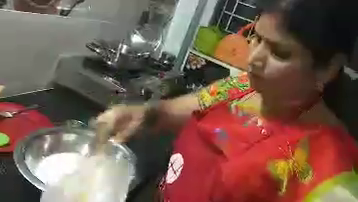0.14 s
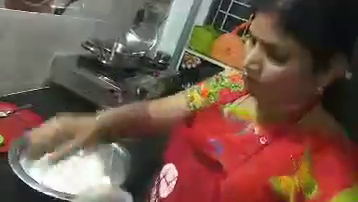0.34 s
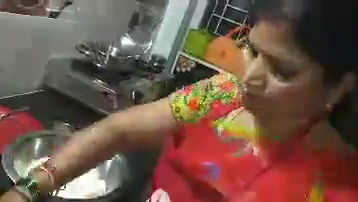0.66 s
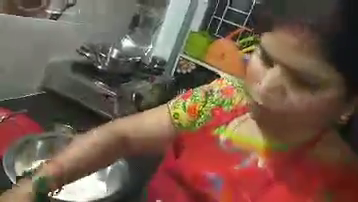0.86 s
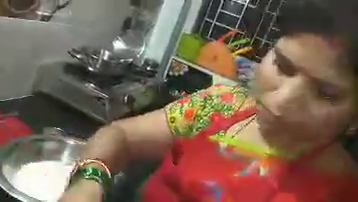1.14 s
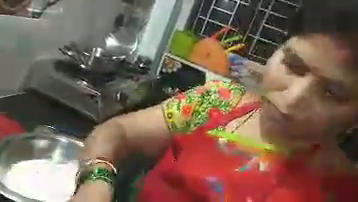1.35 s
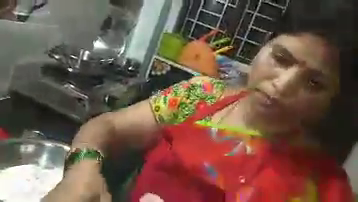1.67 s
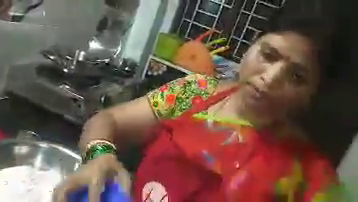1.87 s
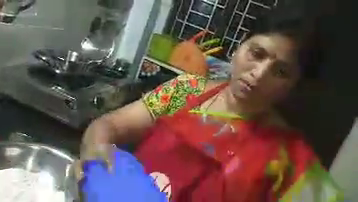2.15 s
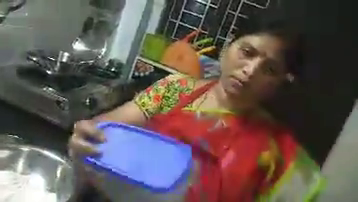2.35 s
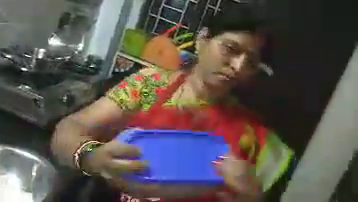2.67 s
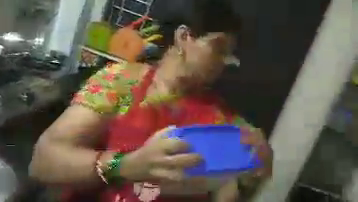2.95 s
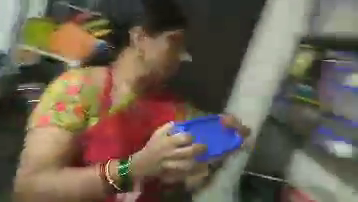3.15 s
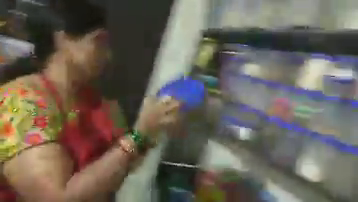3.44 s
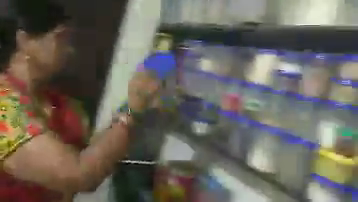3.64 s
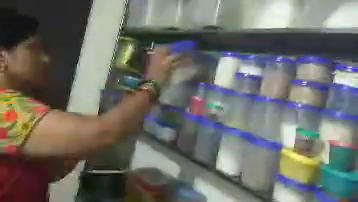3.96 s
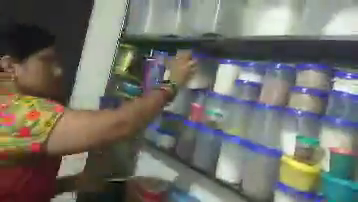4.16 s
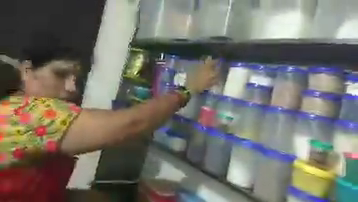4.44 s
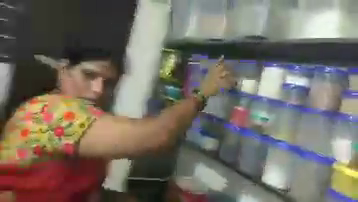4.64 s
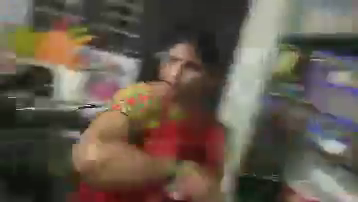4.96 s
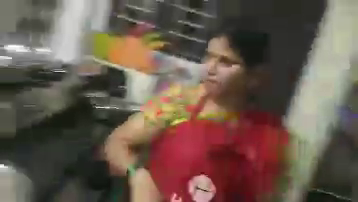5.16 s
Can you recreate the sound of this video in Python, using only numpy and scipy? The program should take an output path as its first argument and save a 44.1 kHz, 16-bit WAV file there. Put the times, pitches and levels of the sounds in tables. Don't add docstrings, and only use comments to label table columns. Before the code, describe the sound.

Light ticks, plastic taps and glassy bangle rattles open over soft room noise. After a quieter moment, a box lid snaps shut hard twice, by far the loudest sounds. Hands rub the plastic, bangles shake strongly, and the box bumps and slides among jars with dull hollow clatter. A few delicate clinks end it. Small reverberant kitchen, heard close by a small microphone with little deep bass.

```python
import sys
import numpy as np
from scipy import signal
from scipy.io import wavfile
from scipy.ndimage import uniform_filter1d

SR = 44100
rng = np.random.default_rng(int(sys.argv[2]) if len(sys.argv) > 2 else 0)


def convert_level_to_amplitude(level_db):
    exponent = np.asarray(level_db, float) / 20
    return 10 ** exponent


def master(y):
    cut = np.clip(np.atleast_2d(y).T, -1, 1)
    pcm = np.round(cut * 32767)
    wavfile.write(sys.argv[1], SR, pcm.astype(np.int16))


N = 234095

# frequency in Hz, level in dB per Hz.
AIR_COLOUR = [(15, -55), (25, -8.5), (195, -8.5), (256, -6.5), (384, -5), (560, -4.5), (659, -10),
              (1020, -8), (1700, -10), (3080, -10.5), (5570, -26), (7310, -21.5), (9070, -29.5),
              (14800, -39), (16000, -33)]
# time in seconds, level in dB.
AIR_LEVEL = [(0, -67), (.17, -65.5), (.21, -62), (1.5, -61), (2.999, -60), (4.6, -61.5), (5.31, -60.5)]
# frequency in Hz, width in Hz, level in dB.
HUM_LINES = [(207.1, 5.3, -71), (375.5, 22, -71), (458, 26.9, -82)]
# frequency in Hz, t60 in seconds.
KITCHEN_T60 = [(80, 0.35), (250, 0.34), (1000, 0.3), (3000, 0.35), (7000, 0.3), (12000, 0.2304),
               (16000, 0.15)]

# frequency in Hz, level in dB.
ARMFUL_MODES = [(4600, -20), (5790, -16), (6540, -11), (7750, -6), (8000, -1), (8400, -6), (8700, -5),
                (9100, -18), (9600, -17), (10270, -11), (10920, -4), (12600, -4), (12900, -9), (13320, 6),
                (13720, -7), (14200, -21), (14600, -11), (15000, -4.5), (15300, -1)]
# start in seconds, peak level in dB, time to swell in seconds,
# treble in dB per octave, grit in dB.
ARM_SHAKES = [(.184, -41, 0.0091, -14, -9), (.531, -33.5, 0.0076, -1, -2.5), (0.642, -25, 0.0095, 1, -0.5),
              (0.794, -42, 0.0067, 3.5, 3), (1.047, -42, 0.011, -3, 2.5), (1.943, -42, 0.0059, -3, -4.5),
              (2.104, -32.5, 0.015, -10, -5), (2.215, -49, 0.0445, 0.5, 6.5),
              (2.348, -48.5, 0.00634, 2.5, 5), (3.670, -18, 0.022, -1, -1.5),
              (3.814, -41.5, 0.014, -16, -0.5), (3.93, -48, 0.0073, 17, 1.5), (4.485, -62, .006, 1, 2),
              (4.55, -66, .02, 2, 7), (4.912, -63, 0.0043, 3, -1), (4.954, -51.5, 0.014, -4, 1),
              (5.108, -46.5, 0.0063, -7, -4), (5.005, -36, 0.012, 4.5, -6.5),
              (5.194, -37.5, 0.017, -14, -5.5)]
# frequency in Hz, level in dB.
BANGLE_MODES = [
    [(4780, -9), (5790, -9), (6350, -10), (7980, 0), (9150, -8), (10270, -17), (12570, 0.5), (12900, 6),
     (13000, -12), (14670, 2), (14780, -11)],
    [(6560, -7.5), (7800, -2), (8550, 4), (8660, -21.5), (10940, -4), (13660, -3.5), (13760, -2),
     (15000, -8), (15360, 0)],
    [(6600, -11), (7470, -19), (8290, 2), (8390, -16), (8690, 3.5), (13340, 2.5), (13830, -5),
     (14280, -2.5), (15200, 2.5)],
    [(4700, -11), (7930, -4), (9050, 2), (9890, -9), (10600, -8.5), (12850, 0.5), (14280, -3), (14520, -2),
     (15000, -6)],
]
# start in seconds, level of low modes in dB,
# level of high modes in dB.
BANGLE_CLINKS = [
    [(.648, -59, -56.5), (.7406, -55, -61), (.9222, -64, -65), (1.0475, -44.5, -45), (1.0746, -55, -52),
     (1.3644, -79, -66), (1.3754, -63, -69.5), (1.429, -46.5, -50.5), (1.7446, -71, -67.5),
     (1.7702, -56, -68), (2.2034, -52, -65)],
    [(.8669, -61, -85), (.911, -62, -56), (1.3414, -61.5, -64), (1.4514, -61, -66.5), (1.83, -62, -64),
     (2.0639, -61, -54), (2.108, -48, -40), (2.1394, -53, -55.5), (2.273, -60, -64), (2.351, -65, -55),
     (5.2026, -64, -46), (5.2291, -52, -58)],
    [(.536, -68.5, -46), (1.9455, -70, -58), (2.0144, -69, -62), (2.2241, -72, -59.5), (3.82, -71, -59),
     (3.8694, -57, -55.5), (3.9367, -60.5, -63), (4.13, -87.5, -68)],
    [(.4293, -76, -67), (.4888, -56, -59), (.5082, -47.5, -40.5), (.538, -50.5, -65), (.645, -59, -66),
     (.796, -52.5, -50), (4.9894, -62, -59), (5.0075, -51, -48.5), (5.1114, -62, -42)],
]
# frequency in Hz, level in dB per Hz.
GLASS_GRIT = [(880, -52), (1500, -24), (3120, -23), (3660, -14), (5330, -14), (7170, -11.5), (8240, -1.5),
              (11700, -15.5), (14600, 2.5), (16000, -12.5)]

# start in seconds, crack in dB, hollow in dB,
# hollow frequency in Hz, treble in dB per octave.
COUNTER_KNOCKS = [(.195, -38.5, -48.5, 6140, -1), (.2218, -32, -61, 1700, -1), (.235, -38, -53, 870, -4.5),
                  (.6995, -42, -57.5, 1850, 1), (1.1057, -23, -37.5, 563, 2), (1.108, -62, -48, 247, -3),
                  (1.1102, -21.5, -46.5, 444, -3), (1.218, -32, -52, 336, -11),
                  (1.2255, -31.5, -43.5, 350, -9.5), (1.2342, -53, -49, 235, 10),
                  (1.9756, -58, -45, 7050, -6), (1.978, -31.5, -49, 323, 5), (2.567, -71, -53, 116, -9),
                  (2.569, -36, -49, 354, 0.5), (3.687, -37.5, -83, 1200, -2)]
# start in seconds, crack in dB, hollow in dB,
# hollow frequency in Hz, treble in dB per octave.
SHELF_KNOCKS = [(4.0883, -39.5, -51, 221, -.5), (4.099, -40.5, -45.5, 237.5, 0),
                (4.1697, -53, -56, 296, -6), (4.1979, -36, -37, 327, -7.5), (4.233, -42, -37, 303, -23),
                (4.2538, -29.5, -35.5, 470, -6.5), (4.2616, -26, -40.5, 455, -3.5),
                (4.2858, -34, -37.5, 464, -16), (4.3, -37, -71, 400, -3), (4.34, -42, -53, 890, 6),
                (4.4012, -22, -29, 338, -3), (4.428, -40, -43.5, 408, -10), (4.452, -47, -39.5, 348, -6)]
# frequency in Hz, level in dB relative to the hollow.
SHELF_BOARD = [(113, -19), (196, -8.5), (914, -14.5)]
# frequency in Hz, level in dB per Hz.
WALL_CRACK = [(410, -21), (700, -5), (1440, -2), (2770, -1.5), (3890, -6.5), (8210, -17), (11700, -26.5),
              (15000, -22), (16000, -53)]

# start in seconds, peak level in dB,
# frequency in Hz, length in cycles.
CLOSE_TICKS = [
    (0.3222, -33.5, 3070, 4.3),
    (0.322, -33, 7400, 2.7),
    (1.757, -42, 296, 2.44),
    (1.8052, -21.5, 434, 0.87),
    (1.8048, -36, 1500, 2.9),
    (3.513, -55, 91, 2.5),
    (3.551, -35, 8300, 3.9),
]

# peak time in seconds, swell in seconds,
# fade in seconds, peak level in dB, treble in dB per octave.
RUB_STROKES = [(.365, 0.026, 0.031, -52, 8.5), (1.228, .03, 0.045, -41.5, -2),
               (1.33, 0.044, 0.067, -53.5, 3), (1.67, .05, .03, -62.5, 7), (1.84, 0.1, 0.18, -46.5, 1),
               (1.972, 0.055, .06, -39, 0.5), (2.6, 0.099, 0.125, -70, -10), (3.33, 0.1485, 0.4, -50.5, -1),
               (3.519, .3, 0.9, -56, 6), (3.68, 0.13, 0.018, -48.5, 4), (4.13, 0.073, 0.55, -47, -4.5),
               (4.265, .12, 0.13, -39.5, -3), (4.4, 0.092, 0.016, -39.5, -4.5)]
# frequency in Hz, level in dB per Hz.
RUB_COLOUR = [(180, -6), (400, -9.5), (1300, -1.5), (3000, 1), (7000, -6.5), (8500, -4.5), (11700, -20),
              (15000, -12), (16500, -15.5)]

# start in seconds, peak level in dB, room in dB.
LID_SNAPS = [
    (2.6561, -2, -0.5),
    (3.075, -2, 3),
]
# frequency in Hz, level in dB per Hz.
SNAP_COLOUR = [
    [(35, -32), (60, -23), (240, -0.5), (412, -2), (796, -10.5), (895, -1.5), (1240, -5), (1370, -2.5),
     (1470, -6), (2400, -1.5), (4000, -7.5), (5500, -5), (9610, -24.5), (15000, -30), (16500, -50.5)],
    [(35, -42), (60, -31), (358, -0.5), (559, -15), (777, -13), (938, -22.5), (1160, -15), (1330, -21),
     (2040, -10), (3500, -11.5), (5870, -16), (8540, -20), (10300, -26), (14700, -25), (16500, -38)],
]
# delay in seconds, level in dB.
SNAP_ECHOES = [
    [(.0012, -1.5), (.0052, 5), (.0075, -11), (.0145, -4)],
    [(.0048, -3), (.0068, -7.5), (.0085, -1.5), (.0125, -12)],
]
# frequency in Hz, t60 in seconds, level in dB.
LID_HOLLOW = [
    (268.6, 0.062, -15.5),
    (314, 0.078, -18),
]


def evened(x):
    return x / np.sqrt(np.mean(x ** 2) + 1e-20)


def read(points, hz):
    f, value = np.transpose(points)
    return np.interp(np.log(hz + 1), np.log(f + 1), value)


def add(mix, s, sound):
    part = mix[round(s * SR):][:len(sound)]
    part += sound[:len(part)]


def coloured(x, points, tilt_db=0):
    hz = np.abs(np.fft.fftfreq(4096, 1 / SR))
    gain_db = read(points, hz) + tilt_db * np.log2(hz / 3000 + 0.16)
    log_gain = np.log(convert_level_to_amplitude(np.maximum(gain_db, -100)))
    taps = np.fft.ifft(np.exp(signal.hilbert(log_gain).conj())).real[:2048]
    return signal.oaconvolve(x, taps / np.linalg.norm(taps))[:len(x)]


def resonate(x, hz, width):
    return signal.lfilter(*signal.iirpeak(hz, hz / width, SR), x)


def burst(decay_s, rattle=0.21, size=4000):
    x = rng.standard_normal(size) * np.exp(-np.arange(size) / SR / decay_s) * rattle
    x[0] = 1
    return x / np.linalg.norm(x)


def room(x):
    taps = rng.standard_normal(SR) * (rng.random(SR) < .3)
    hz, t, z = signal.stft(taps, SR, nperseg=256)
    fall_db = -60 * t / read(KITCHEN_T60, hz)[:, None]
    z /= np.sqrt(np.average(abs(z) ** 2, axis=1, weights=convert_level_to_amplitude(-260 * t)))[:, None]
    next_door = convert_level_to_amplitude(-26.5 + 0.26 * fall_db)
    tail = signal.istft(z * (convert_level_to_amplitude(fall_db) + next_door), SR, nperseg=256)[1]
    tail *= np.clip(np.arange(len(tail)) / SR / 0.0044 - .3, 0, 1)
    return signal.fftconvolve(x, tail / np.linalg.norm(tail))


def air():
    frames, hz = N // 256 + 5, np.fft.rfftfreq(1024, 1 / SR)
    a, b, patches = rng.standard_normal((frames, 513, 3)).T
    patches = evened(uniform_filter1d(uniform_filter1d(patches, 10, 0), 12, 1))
    patchy_db = 1.2
    gain = convert_level_to_amplitude(read(AIR_COLOUR, hz)[:, None] + patchy_db * patches)
    wash = evened(signal.istft((a + 1j * b) * gain, nperseg=1024, noverlap=768)[1][:N])
    hum = sum(convert_level_to_amplitude(db) * evened(resonate(rng.standard_normal(N), f, width)) for f, width, db in HUM_LINES)
    s, level_db = np.transpose(AIR_LEVEL)
    drift = convert_level_to_amplitude(np.interp(np.arange(N) / SR, s, level_db + 61.5))
    return (convert_level_to_amplitude(-58) * wash + hum) * drift


def ring(hz, db, size, rise_s=0.00033):
    hz, db, t = np.c_[hz], np.c_[db], np.arange(size) / SR
    luck = rng.standard_normal((2, len(hz), 1))
    beat = 1 + 0.67 * np.cos(2 * np.pi * (40 * luck[0] * t + luck[1]))
    t60 = 0.08 * (8000 / hz) ** 0.15
    modes = convert_level_to_amplitude(db - 60 * t / t60) * beat * np.sin(2 * np.pi * hz * t)
    return modes.sum(0) * np.minimum(t / rise_s, 1)


def bangles():
    tones, grit = np.zeros((2, N))
    split_hz, uneven_db = 11800, 2.5
    for modes, clinks in zip(BANGLE_MODES, BANGLE_CLINKS):
        hz, share_db = np.transpose(modes)
        for s, low_db, high_db in clinks:
            touch_db = np.where(hz < split_hz, low_db, high_db)
            db = share_db + touch_db + uneven_db * rng.standard_normal(len(hz))
            add(tones, s, ring(hz, db, size=7000))
            add(tones, s + rng.uniform(0.0066, .025), ring(hz, db - 20.5, size=7000))
            add(grit, s, convert_level_to_amplitude(max(low_db, high_db) + 15.5) * burst(0.0047, rattle=0.34))
    hz, share_db = np.transpose(ARMFUL_MODES)
    for s, db, swell_s, tilt, grit_db in ARM_SHAKES:
        mode_db = db - 22.5 + share_db + tilt * np.log2(hz / 11000)
        for u in np.linspace(.05, 2.6, num=22):
            swell = u * np.exp(-u ** 2 / 1.42)
            luck = rng.standard_normal((3, len(hz)))
            at = s + swell_s * (u + .08 * luck[2, 0])
            add(grit, at, convert_level_to_amplitude(db + 17 + grit_db) * swell * burst(0.0075, rattle=0.16))
            pitch = np.minimum(hz * (1 + 0.0154 * luck[0]), 15550)
            add(tones, at, swell * ring(pitch, mode_db + 3.3 * luck[1], size=5000))
    out = tones + coloured(grit, GLASS_GRIT)
    return out + convert_level_to_amplitude(-3.0) * room(out)[:N]


def hollow(x, hz):
    y = x
    for relative_width in (.5, 0.37, 1.15):
        y = resonate(y, hz, relative_width * hz)
    return y / np.linalg.norm(y)


def knocks(rows, room_db, board=()):
    out = np.zeros(N)
    for s, db, hollow_db, hz, tilt in rows:
        rattle, blow = burst(0.006), burst(.003, rattle=0)
        answer = sum(convert_level_to_amplitude(under_db) * hollow(blow, f) for f, under_db in board)
        body = convert_level_to_amplitude(hollow_db + 29.0) * (hollow(blow, hz) + answer)
        add(out, s, convert_level_to_amplitude(db + 13.5) * coloured(rattle, WALL_CRACK, tilt) + body)
        into_room = convert_level_to_amplitude(db + 15) * coloured(blow, WALL_CRACK, tilt) + body
        add(out, s, convert_level_to_amplitude(room_db) * room(into_room))
    return out


def ticks():
    out = np.zeros(N)
    for s, db, hz, cycles in CLOSE_TICKS:
        turns = np.arange(0, cycles, hz / SR)
        envelope = np.minimum(turns / 0.365, 1) * (1 - turns / cycles)
        add(out, s, convert_level_to_amplitude(db) * np.cos(2 * np.pi * turns) * envelope)
    return out


def rubs():
    out = np.zeros(N)
    ends_db = -20
    for s, swell, fade, db, tilt in RUB_STROKES:
        t = np.arange(-swell, fade, 1 / SR)[:SR]
        slips = rng.standard_normal(SR) * convert_level_to_amplitude(2.8 * np.minimum(rng.exponential(1, SR), 5))
        pressure_db = ends_db * np.where(t < 0, -t / swell, t / fade)
        friction = evened(coloured(slips, RUB_COLOUR, tilt))[:len(t)]
        add(out, s - swell, convert_level_to_amplitude(db - 5 + pressure_db) * friction)
    return out + convert_level_to_amplitude(-20.5) * room(out)[:N]


def snaps():
    out, t = np.zeros(N), np.arange(SR // 2) / SR
    for snap, colour, echoes, lid in zip(LID_SNAPS, SNAP_COLOUR, SNAP_ECHOES, LID_HOLLOW):
        s, db, room_db = snap
        hz, t60, lid_db = lid
        for late, echo_db in [(0, 0.0061)] + echoes:
            add(out, s + late, convert_level_to_amplitude(db + 8.5 + echo_db) * coloured(burst(0.0018, rattle=0.22), colour))
        add(out, s, convert_level_to_amplitude(db + lid_db - 60 * t / t60) * np.sin(2 * np.pi * hz * t))
        add(out, s, convert_level_to_amplitude(db + 12.0 + room_db) * room(coloured(burst(.001, rattle=0), colour)))
    return out


def scene():
    counter = knocks(COUNTER_KNOCKS, room_db=-4)
    shelf = knocks(SHELF_KNOCKS, room_db=-1.5, board=SHELF_BOARD)
    return (air() + bangles() + counter + shelf + ticks() + rubs() + snaps())[None]


def roll_off(x):
    return signal.sosfilt(signal.butter(12, 16820, fs=SR, output="sos"), x)


def record(dry):
    thin = signal.sosfilt(signal.butter(2, 70, "high", fs=SR, output="sos"), dry)
    edge = signal.firwin(511, 15550, window=("kaiser", 4), fs=SR)
    return roll_off(signal.oaconvolve(thin, edge[None], "same"))


dry = scene()
out = record(dry)
master(out)
```